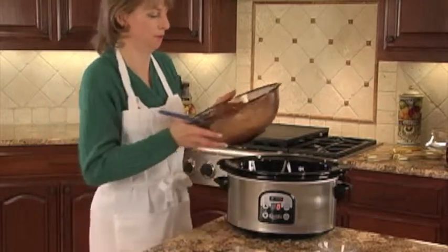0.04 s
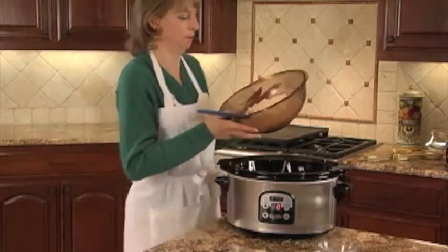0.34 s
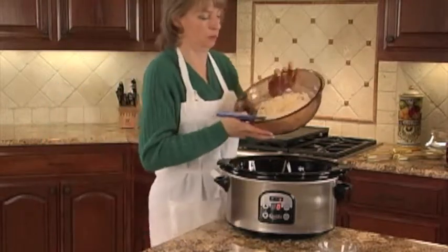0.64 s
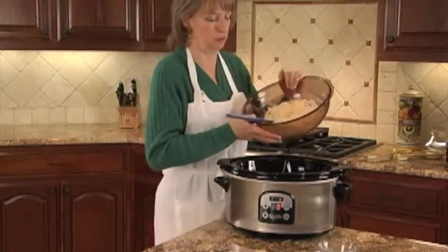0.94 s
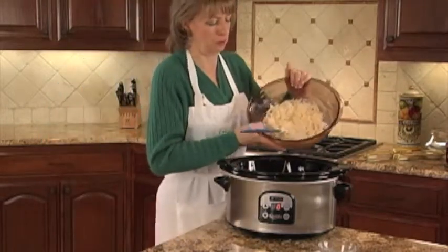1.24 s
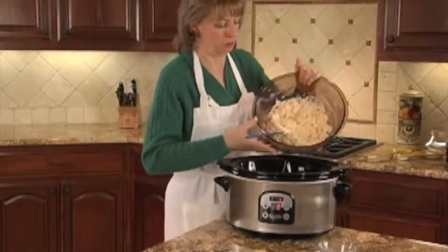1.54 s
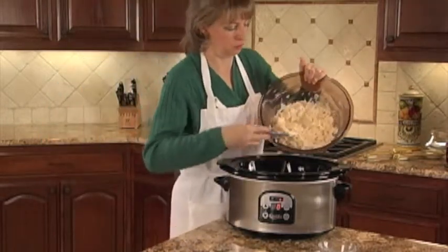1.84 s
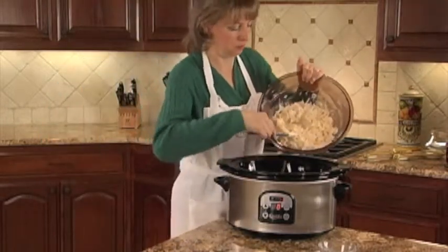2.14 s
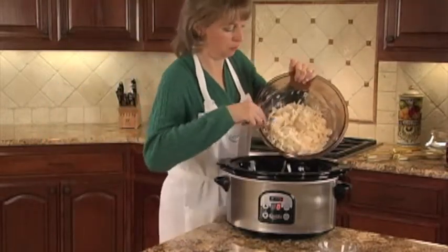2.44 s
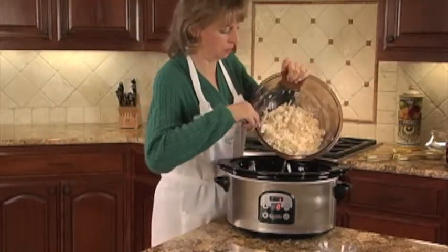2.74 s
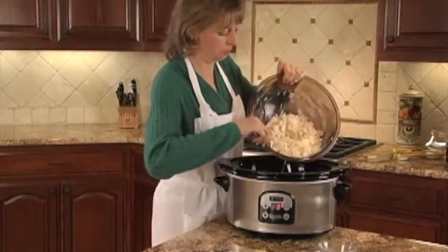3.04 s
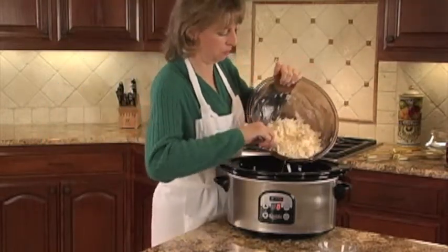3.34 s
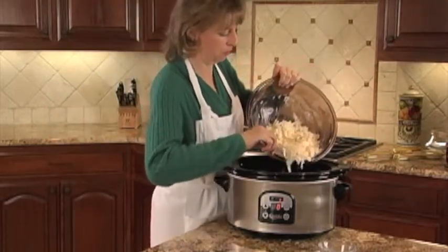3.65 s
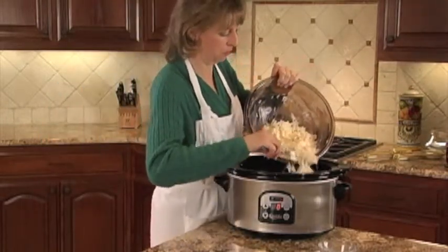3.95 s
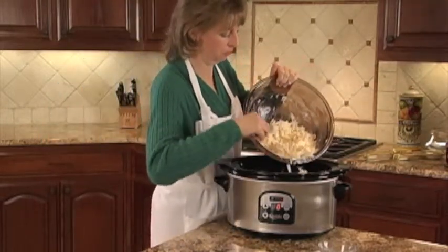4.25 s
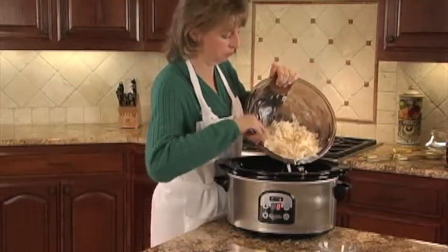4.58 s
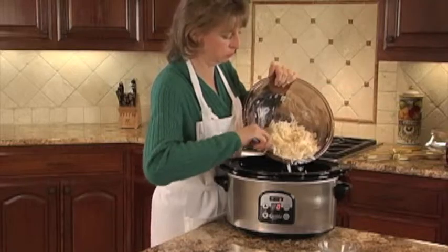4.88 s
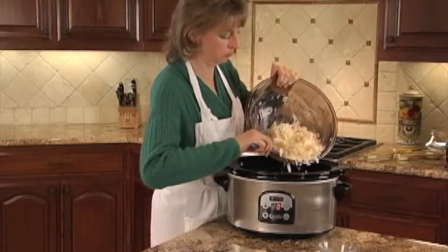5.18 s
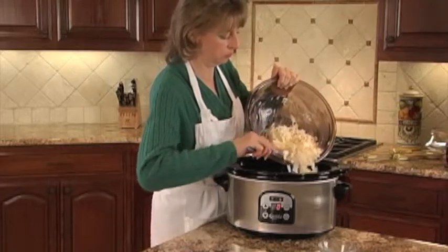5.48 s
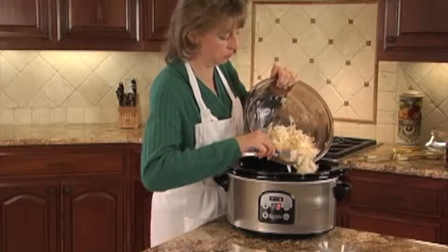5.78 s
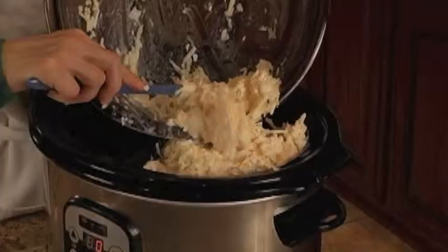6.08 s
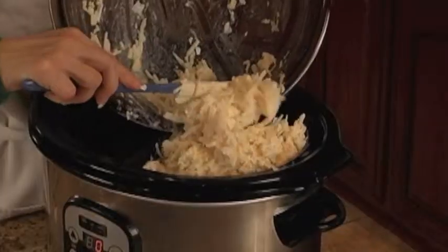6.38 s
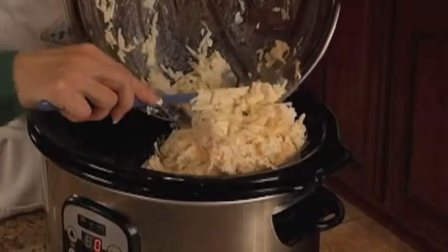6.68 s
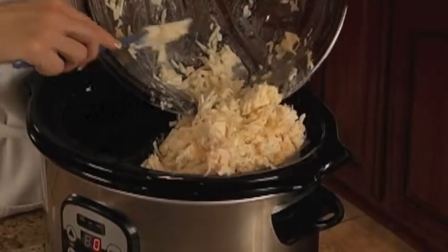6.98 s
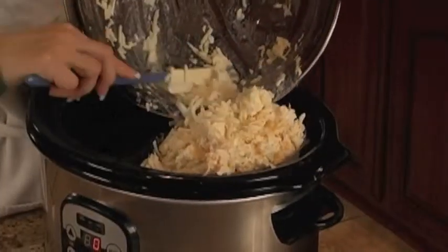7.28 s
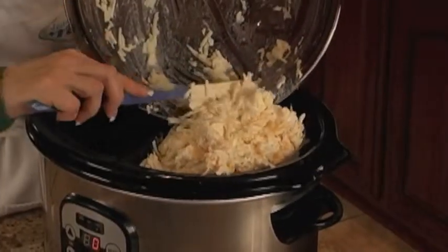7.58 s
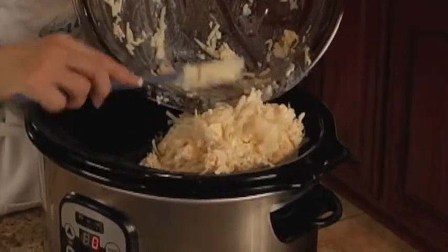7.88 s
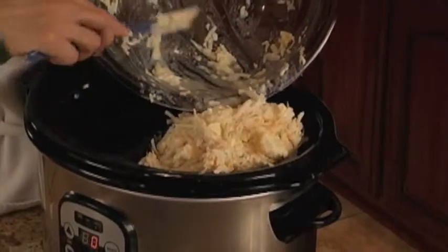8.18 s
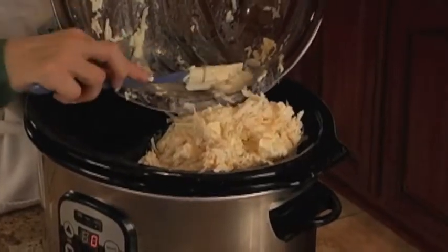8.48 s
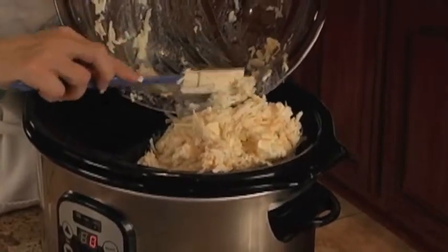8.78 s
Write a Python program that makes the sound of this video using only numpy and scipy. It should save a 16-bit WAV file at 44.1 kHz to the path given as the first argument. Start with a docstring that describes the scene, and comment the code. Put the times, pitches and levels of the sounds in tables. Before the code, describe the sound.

Close to the microphone, a spatula clinks lightly on a hand-held glass bowl and faintly smears a soft mixture. Midway the bowl knocks twice against a stoneware crock, then once more, much louder, with a short kitchen echo. Two brighter clinks follow near the end. Dull handling thumps, faint sleeve rustle, ventilation rumble and electrical hum lie underneath, slightly left of centre.

```python
"""A glass mixing bowl, close to the microphone, is emptied with a spatula over a stoneware crock.
The blade clinks on the hand-damped glass and smears the soft mixture. The bowl knocks three times
on the crock, which throws more of its sound into the kitchen. Underneath lie dull handling thumps,
rustling sleeves, ventilation rumble and mains hum, all a little left of centre.
A thin electronic whistle sits in the middle."""
import sys
import numpy as np
from scipy import signal
from scipy.fft import rfft, irfft
from scipy.io import wavfile
from scipy.ndimage import uniform_filter1d

SR = 44100
rng = np.random.default_rng(int(sys.argv[2]) if len(sys.argv) > 2 else 0)


def store_wav(level_fs):
    """Save 16-bit WAV to argv[1]."""
    pcm = np.round(np.clip(np.atleast_2d(level_fs), -1, 1) * 32767)
    wavfile.write(sys.argv[1], SR, pcm.T.astype(np.int16))


N = 393627
TIME = np.arange(N) / SR
AGE = TIME[:SR]  # seconds since a blow
FULL_UNTIL_S = 6  # the mixture has slid out by then

# glass bowl, damped by hand and filling: pitch_hz, gain_db, t60_s
GLASS_MODES = [(356, -4.5, .2), (958, -2.5, .14), (660, -16, .035), (1760, -6, .09), (2400, -8, .025),
               (2790, 3, .035), (3530, -14, .07), (3942, -4, .05), (4572, -17, .07), (5205, -10, .06),
               (5585, -14, .07), (5750, -3.5, .032), (6292, -6.5, .09), (6490, -9, .045), (6635, -18, .08),
               (6850, -16, .05), (7430, -7, .02), (7960, -6, .028), (8660, -7, .024), (9150, -13, .016),
               (9540, -18, .03)]
# how the mixture's weight and the grip shift the balance of those modes: frequency_hz, gain_db
FULL_BOWL_EQ = [(356, -8), (958, 0), (2430, 9.5), (2790, 5.5), (3938, 1.5), (4572, 9), (5225, 11.5),
                (5700, 6.5), (6300, -18), (6640, 15.5), (7000, 2)]
# spatula on glass: start_s, level_db, low_modes_db, tilt_db_per_octave, ring_factor,
# spot_hz, spot_db (the modes that the struck spot favours or mutes), rim_after_ring_db
SPATULA_CLINKS = [(0.5605, -58, 3, 8.5, 1.5, 1780, 12, -12), (0.819, -47, -13, -1.5, 2.2, 1780, 9.5, -5),
                  (1.7876, -49, 10, -20, 1.2, 2590, -23, -36),
                  (2.0308, -42.5, 5, -8, 1.27, 2970, -13.5, -34),
                  (7.1556, -36, 4.5, 1.5, 0.8, 5640, 3, -38), (7.1732, -57, -10, -11, 0.54, 3000, 10, -32),
                  (7.2596, -56, 8, -23, 0.24, 2700, -10, -30), (8.204, -33.5, 4.5, 0, 1.13, 2850, 8, -24),
                  (8.2497, -47, -11, -13, 0.91, 2400, -7, -32), (8.2900, -46, 14, -24, 1.2, 1900, 10, -29)]
# dry scuff of the blade on the glass: frequency_hz, gain_db
SCUFF_SPECTRUM = [(600, -16), (1350, 0.5), (2500, 4), (3400, -50), (4600, 0), (5800, 8), (9000, 0),
                  (15000, -38)]
# bowl against crock: start_s, level_db, tilt_db_per_octave, ring_factor, rim_clank_db, belly_boom_db
CROCK_KNOCKS = [(3.7175, -30, -6.5, 0.84, -3, 5), (4.0300, -31.5, -5, 1, 0, 8),
                (5.4570, -19, -3.5, 0.84, 0, -1)]
# bowl rim and crock ringing together: pitch_hz, gain_db, t60_s
KNOCK_MODES = [(337, -10.5, .12), (404, -10.5, .11), (452, -12, .11), (505, -9.5, .1), (572, -11, .07),
               (640, -2.5, .085), (721, -4.5, .08), (787, -11, .08), (840, -11, .1), (937, -20, .12),
               (1040, -12, .06), (1115, -8, .065), (1250, -9, .065), (1367, -11, .07), (1770, -17, .06),
               (1997, -18, .13), (2189, -11.5, .17), (2770, -12.5, .04), (3079, -19.5, .08),
               (3525, -20.5, .08), (3670, -19.5, .035), (4050, -20, .05), (4400, -22, .06),
               (5250, -17.5, .03), (6580, -24, .08)]
# broad first push of a knock: pitch_hz, gain_db, t60_s
PUSH_MODES = [(680, 12, .011), (520, 6, .012), (1150, 5, .01), (230, -22, .04)]
# dry crack of the contact: frequency_hz, gain_db
CRACK_SPECTRUM = [(120, -7), (330, -6), (700, 8), (1280, 1), (1500, -17), (2500, -10), (3400, -18),
                  (6000, -15.5), (9500, -16.5), (14000, -25)]
# clear ticks of spatula, rim and sticky mixture: start_s, level_db, centre_hz, width_octaves, t60_s
SPATULA_TICKS = [(.5607, -54, 7300, 0.49, 0.024), (.8187, -63, 7000, 0.57, 0.011),
                 (.819, -49.5, 2650, 0.33, 0.019), (1.7518, -57, 5550, 0.9, 0.012),
                 (3.5649, -68, 2000, 0.35, 0.0083), (4.1225, -73, 4500, 1.3, .006),
                 (4.1366, -62, 8500, 0.41, 0.0073), (4.5172, -58, 1700, 0.67, 0.014),
                 (4.5175, -62.5, 5600, .45, .016), (5.3873, -68.5, 4430, 0.18, 0.016),
                 (7.1558, -59, 8500, 1.2, .009), (7.156, -52, 3750, 0.13, 0.027),
                 (7.862, -75, 5300, 0.23, .03), (8.2036, -58, 7500, 1.1, 0.0088),
                 (8.29, -59, 1880, 0.69, 0.024), (8.2642, -60.5, 8000, .9, 0.044)]
# dull bumps and soft flops of the mixture: start_s, level_db, centre_hz, width_octaves, t60_s
MIXTURE_FLOPS = [(.2005, -48.5, 560, 0.48, 0.062), (.215, -47.5, 415, 0.57, 0.23),
                 (.966, -50.5, 258, 0.69, 0.047), (1.143, -60.5, 770, 0.36, 0.57),
                 (4.114, -50, 715, 0.36, 0.036), (8.204, -50, 114, 0.15, 0.083)]
# firm strokes of the spatula: middle_s, half_length_s, level_db
SMEAR_STROKES = [(0.22, 0.036, -68.5), (0.371, 0.012, -68.5), (0.863, 0.012, -64), (0.897, 0.018, -67),
                 (1.506, .065, -78), (4.081, 0.0093, -60.5), (6.07, 0.014, -77)]
# mixture under the blade: frequency_hz, gain_db
SMEAR_SPECTRUM = [(1000, 5.5), (3000, -8.5), (5500, 1), (8500, -12), (14000, -11)]
# runs of soft body thumps: start_s, end_s, period_s, level_db
BODY_THUMPS = [(.105, 2.3, .41, -44), (2.642, 8.93, .347, -51.5)]
# dull shuffle that goes with each thump: frequency_hz, gain_db
SHUFFLE_SPECTRUM = [(40, -15), (100, 2), (300, -21.5), (700, -19), (2500, -49)]
# sleeves and mixture shifting: middle_s, half_length_s, level_db, centre_hz, width_octaves
MOVEMENTS = [(0.922, 0.025, -59, 330, 0.52), (1.205, 0.07, -61.5, 330, 0.44),
             (1.356, 0.051, -59, 260, 0.41), (1.63, 0.073, -60.5, 296, 1), (1.851, .1, -66, 298, 0.33),
             (2.097, 0.049, -67, 298, 0.84), (6.119, 0.03, -62, 503, 0.41), (6.233, 0.055, -56, 230, 0.25),
             (6.844, 0.049, -57.5, 257, 0.2), (7.075, 0.045, -51, 246, 0.076), (7.6, 0.14, -56, 239, 0.11)]
# course of the ventilation rumble: time_s, level_db
VENT_LEVELS = [(0.0, -60.5), (.98, -59), (1.04, -64.5), (1.12, -66), (1.18, -63), (1.74, -60),
               (2.36, -62.5), (3.01, -59), (8.93, -58)]
# air from the ventilation: frequency_hz, gain_db
VENT_SPECTRUM = [(15, -29), (30, -8), (45, 7), (80, -4.5), (118, -9), (148, -9), (185, -2), (260, -5.5),
                 (345, -2.5), (430, -11.5), (700, -15.5), (1200, -24.5), (2500, -40.5), (5000, -44),
                 (15000, -59)]
# fan tones at the mean ventilation level: pitch_hz, level_db, late_change_db
FAN_TONES = [(116.1, -66.5, -1.5), (213.8, -71.5, 7), (244.1, -66, -0.5), (337.6, -68.5, -3), (359, -72, 0),
             (420, -77.5, 5), (518, -77.5, -2), (574, -85, 6.5), (820, -78, -1)]
# mains fundamental and third harmonic: pitch_hz, gain_db
MAINS_TONES = [(59.8, -1), (179.4, -20.5)]
# steady hiss: frequency_hz, gain_db
HISS_SPECTRUM = [(1000, 8.5), (2800, -0.5), (3800, -9), (6000, -2.5), (9000, -3), (13500, -5.5),
                 (14400, -2.5), (14800, -28)]
# faint electronic whines: pitch_hz, level_db
WHINE_TONES = [(3130, -94.5), (5390, -100), (6745, -93.5), (8092, -91.5), (9440, -101)]
# one reflection off the counter, one off the cupboards: delay_s, relative_gain
REFLECTIONS = [(.01235, .4), (.0311, .14)]
# decay of the kitchen: frequency_hz, t60_s
KITCHEN_DECAY = [(150, 0.72), (600, 0.76), (1500, 0.63), (3000, 0.46), (6000, 0.34), (12000, 0.27)]


def clinks(scuff_db=-10, scuff_t60=0.062, low_hz=1300, knee_hz=2800, rim_hz=2800, rim_t60=0.66):
    """Blade chatters on glass: the spot decides which modes ring most, the hardness how brightly."""
    out, hz = np.zeros(N), np.array(GLASS_MODES)[:, 0]
    for s, db, low_db, tilt_db, length, spot_hz, spot_db, after_db in SPATULA_CLINKS:
        spot = low_db * (hz < low_hz) + spot_db * hump(hz, spot_hz, octaves=0.12)
        load = at(FULL_BOWL_EQ, hz) * (s < FULL_UNTIL_S)
        colour_db = spot + load + tilt_db * octaves_above(hz, knee_hz)
        pitch = 1.01 if s < 1 else 1  # held level at first, the bowl rings slightly higher
        glass = ring(GLASS_MODES, colour_db, length, rough=0.57, rate=173, pitch=pitch)
        rim = ring([(rim_hz, after_db, rim_t60)], rough=0.98, rate=140)
        scuff_colour = [(f, d + tilt_db * octaves_above(f, knee_hz) / 2) for f, d in SCUFF_SPECTRUM]
        scuff = amp(scuff_db) * noise(scuff_colour, SR) * fade(scuff_t60)
        add(out, s, blow(blow(glass + rim, 0) + scuff, db))
    return out


def knocks(crack_db=-10, crack_t60=0.092, rattle_db=-20, rattle_t60=0.36, knee_hz=1500,
           clank_hz=2120, belly_hz=450, contact_s=0.0007, rebound_s=0.0123, rebound_db=-15):
    """The heavy bowl meets the crock: modes swell together into a thud, with a crack and a rattle."""
    out, hz = np.zeros(N), np.array(KNOCK_MODES)[:, 0]
    radiation = signal.butter(2, 110, "highpass", fs=SR, output="sos")  # small bodies give little bass
    push = (1 - np.exp(-AGE / contact_s)) ** 2
    for s, db, tilt_db, length, clank_db, belly_db in CROCK_KNOCKS:
        colour_db = tilt_db * octaves_above(hz, knee_hz)
        colour_db += clank_db * hump(hz, clank_hz, 0.29) + belly_db * hump(hz, belly_hz, 0.063)
        thud = ring(PUSH_MODES, sign=1) * push
        rebound = amp(rebound_db) * np.interp(AGE - rebound_s, AGE, thud, left=0)  # the bowl settles
        ringing = ring(KNOCK_MODES, colour_db, length, rough=0.25, sign=1) * push
        crack_colour = [(f, d + tilt_db * octaves_above(f, knee_hz)) for f, d in CRACK_SPECTRUM]
        crack = amp(crack_db) * fade(crack_t60)
        rattle = amp(rattle_db) * fade(rattle_t60 * length)  # dense, weak modes
        knock = blow(ringing + thud + rebound, 0) + noise(crack_colour, SR) * (crack + rattle)
        add(out, s, blow(signal.sosfilt(radiation, knock), db))
    return out


def taps(rows):
    """Ticks and flops without a pitch: a band of noise rises within a cycle and dies away."""
    out = np.zeros(N)
    for s, db, hz, octaves, t60 in rows:
        envelope = blow(fade(t60) * (1 - np.exp(-AGE * hz)), db)
        burst = envelope * band(hz, octaves)
        add(out, s, even(burst, narrow_hz=hz * octaves / 10, wide_hz=hz * octaves))
    return out


def smears(scrape_db=-81.5, uneven_db=4, stroke_rate=9, grain_db=3, grain_rate=350):
    """The mixture sticks and lets go in tiny steps under the blade: firm strokes over light scraping."""
    firm = sum(amp(db) * bell(TIME - s, half) for s, half, db in SMEAR_STROKES)
    light = amp(scrape_db + uneven_db * walk(stroke_rate)) * bell(TIME - 4, half_width=4.5)
    grains = noise(SMEAR_SPECTRUM, N) * amp(grain_db * walk(grain_rate))
    return (firm + light) * unit(grains)


def thumps(hz=42, rise_s=0.0098, pitch_spread=0.14, scatter_db=2.5, shuffle_db=-13, jolt_db=-14.5):
    """Paced body thumps, and each knock's jolt through the arms, swing for a couple of slow cycles."""
    jolts = [(s, db + jolt_db) for s, db, *_ in CROCK_KNOCKS]
    paced = [(s, db) for start, end, period, db in BODY_THUMPS for s in np.arange(start, end, period)]
    out, events = np.zeros(N), jolts + paced
    swell = AGE / rise_s * np.exp(1 - AGE / rise_s)
    for (s, db), (force, detune) in zip(events, rng.standard_normal((len(events), 2))):
        swing = np.sin(2 * np.pi * hz * (1 + pitch_spread * detune) * AGE)
        shuffle = amp(shuffle_db) * noise(SHUFFLE_SPECTRUM, SR)
        add(out, s, amp(db + scatter_db * force) * swell * (swing + shuffle))
    return out


def rustle(uneven_db=2, rate=40):
    """Sleeves and mixture shift as the bowl is tipped; each movement swells and dies away unevenly."""
    out = np.zeros(N)
    for s, half, db, hz, octaves in MOVEMENTS:
        add(out, s - 0.5, amp(db) * bell(AGE - 0.5, half) * band(hz, octaves))
    return out * amp(uneven_db * walk(rate))


def ventilation(air_gain_db=1, flutter_db=0.6):
    """Room tone: fluttering air, and fan tones that follow its level and change balance late on."""
    vent_db = np.interp(TIME, *np.transpose(VENT_LEVELS))
    air = noise(VENT_SPECTRUM, N) * amp(vent_db + air_gain_db + flutter_db * walk(4.2))
    late = np.clip(10 * (TIME - FULL_UNTIL_S), 0, 1)
    fan = tones([(hz, db + change_db * late) for hz, db, change_db in FAN_TONES], wander=1, rate=11)
    return air + fan * amp(vent_db - np.mean(vent_db))


def mains_hum(base_db=-64, swell_db=11.5, swell_s=2.3, rise_s=0.56, drop_s=5.9, fall_s=0.052):
    """Mains hum swells once, holds and drops back, wavering by about a decibel."""
    rise = (TIME - swell_s) / rise_s
    fall = 1 - (TIME - drop_s) / fall_s
    level_db = base_db + swell_db * np.clip(np.minimum(rise, fall), 0, 1)
    return unit(tones(MAINS_TONES, wander=0.13, rate=3.2)) * amp(level_db + walk(38))


def noise_floor(hiss_db=-73):
    """Steady hiss with faint electronic whines."""
    return amp(hiss_db) * noise(HISS_SPECTRUM, N) + tones(WHINE_TONES, wander=0.72, rate=11)


def whistle(hz=15734.3, db=-79):
    """A thin, steady electronic tone near the top of hearing."""
    return amp(db) * unit(np.sin(2 * np.pi * hz * TIME))


def kitchen(x, wet_db, echo_db, build_s=0.0096):
    """The microphone hears direct sound, near reflections, then a diffuse tail whose treble dies first."""
    hz, white = np.fft.rfftfreq(SR, 1 / SR), rfft(rng.standard_normal(SR))
    centres, t60s = np.transpose(KITCHEN_DECAY)
    bands = [irfft(white * at(np.c_[centres, share], hz), SR) for share in np.eye(len(centres))]
    tail = sum(part * fade(t60) for part, t60 in zip(bands, t60s))
    tail = even(tail * (1 - bell(AGE, build_s)), narrow_hz=25, wide_hz=400)
    response = amp(wet_db) * tail / np.sqrt(np.sum(tail ** 2))
    for delay, gain in REFLECTIONS:
        response[int(delay * SR)] += gain * amp(echo_db)
    return x + signal.fftconvolve(x, response)[:N]


def ring(modes, colour_db=0, length=1, rough=0, rate=150, pitch=1, sign=-1):
    """Struck modes, neighbours opposed (sign -1) or in step; chatter shakes phases by `rough` radians."""
    out, gains = np.zeros(SR), amp(np.array(modes)[:, 1] + colour_db)
    for k, (hz, _, t60) in enumerate(modes):
        steps = rng.standard_normal(400)
        steps[0] = 0  # every mode starts from rest
        chatter = rough * np.interp(AGE * rate, np.arange(len(steps)), steps)
        out += sign ** k * gains[k] * fade(t60 * length) * np.sin(2 * np.pi * hz * pitch * AGE + chatter)
    return out


def tones(lines, wander, rate):
    """Sustained tones whose phases drift by about `wander` radians."""
    return sum(amp(db) * unit(np.sin(2 * np.pi * hz * TIME + wander * walk(rate))) for hz, db in lines)


def noise(points, size):
    """Noise of rms 1 coloured by (Hz, dB) points."""
    gains = amp(at(points, np.fft.rfftfreq(size, 1 / SR)))
    return unit(irfft(rfft(rng.standard_normal(size)) * gains, size))


def band(hz, octaves):
    """One second of noise around a centre frequency."""
    return noise([(hz * 2 ** (k * octaves), -17 * (k / 2) ** 2) for k in range(-4, 5)], SR)


def even(x, narrow_hz, wide_hz):
    """Level out lone peaks and holes in the spectrum of a noisy decay, so that it has no pitch."""
    spectrum = rfft(x, 2 * SR)
    power = lambda width_hz: np.abs(uniform_filter1d(np.abs(spectrum) ** 2, int(2 * width_hz))) + 1e-12
    return irfft(spectrum * np.sqrt(power(wide_hz) / power(narrow_hz)))[:SR]


def walk(rate):
    """Random drift with a spread near 1, taking `rate` steps a second."""
    steps = rng.standard_normal(N // 10)
    return np.interp(TIME * rate, np.arange(len(steps)), steps)


def at(points, hz):
    """Read (Hz, value) points on a log-frequency axis."""
    f, value = np.transpose(points)
    return np.interp(np.log(np.maximum(hz, 1)), np.log(f), value)


def octaves_above(hz, knee_hz):
    """Octaves above the knee, 0 below it."""
    return np.log2(np.maximum(hz / knee_hz, 1))


def bell(offset, half_width):
    """Bell curve, 1 at zero offset and 1/e at the half width."""
    return np.exp(-(offset / half_width) ** 2)


def hump(hz, centre_hz, octaves):
    """Bell curve on a log-frequency axis."""
    return bell(np.log2(hz / centre_hz), octaves)


def fade(t60):
    """Exponential decay, 60 dB down after t60 seconds."""
    return np.exp(-np.log(1000) * AGE / max(t60, 1e-3))


def blow(x, db):
    """Set the rms level of a blow's first hundredth of a second."""
    return x * amp(db) / np.sqrt(np.mean(x[:SR // 100] ** 2))


def amp(db):
    """Decibels to gain."""
    return 10 ** (np.asarray(db) / 20)


def unit(x):
    """Scale to rms 1."""
    return x / np.std(x)


def add(track, s, x):
    """Mix a sound into a track at s seconds."""
    i = max(int(s * SR), 0)
    track[i:i + len(x)] += x[:N - i]


def scene(left_db=-0.65, right_db=-4.5):
    """Bowl close to the microphone, more room on the crock; all but the whistle a little to the left."""
    bowl = kitchen(clinks() + taps(SPATULA_TICKS) + smears(), wet_db=-15.5, echo_db=-7.5)
    crock = kitchen(knocks(), wet_db=-13.5, echo_db=-16.5)
    handling = taps(MIXTURE_FLOPS) + thumps() + rustle()
    background = ventilation() + mains_hum() + noise_floor()
    return amp([[left_db], [right_db]]) * (bowl + crock + handling + background) + whistle()


def record(dry):
    """The recorder cuts the very top, above 16.1 kHz."""
    return signal.sosfilt(signal.ellip(10, 0.1, 80, 16100, fs=SR, output="sos"), dry)


dry = scene()
out = record(dry)
store_wav(out)
```